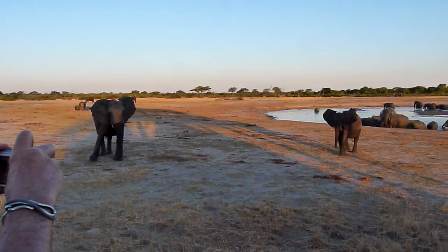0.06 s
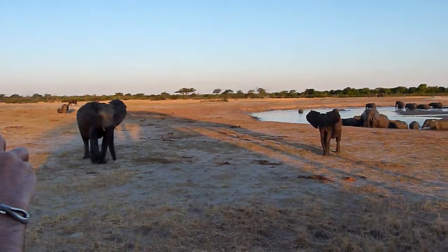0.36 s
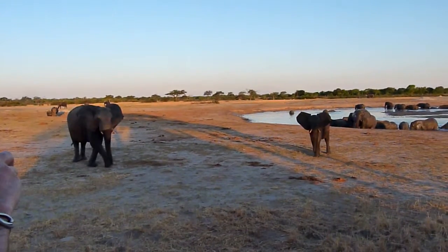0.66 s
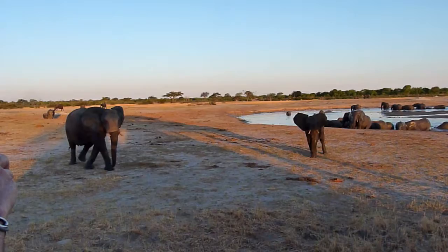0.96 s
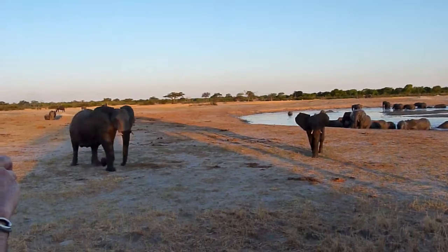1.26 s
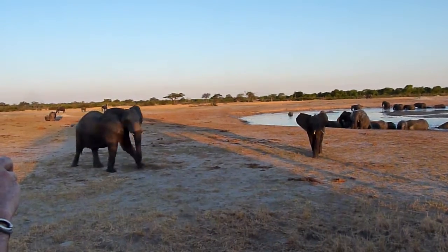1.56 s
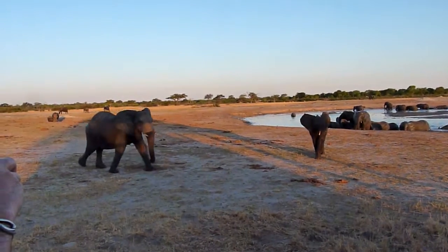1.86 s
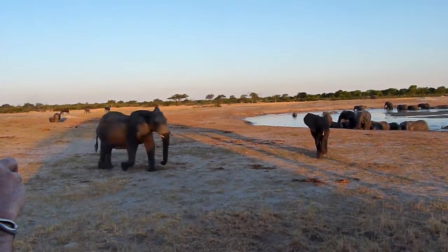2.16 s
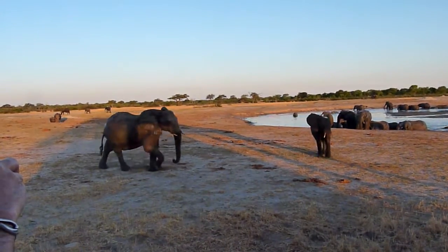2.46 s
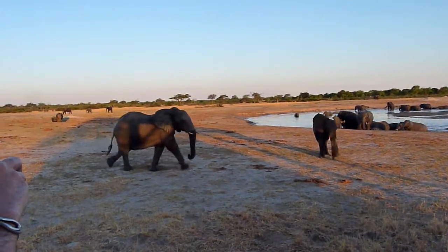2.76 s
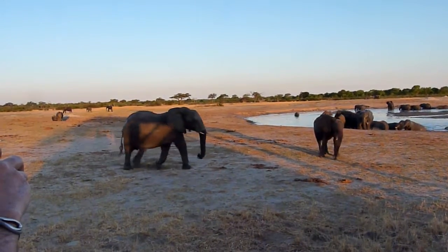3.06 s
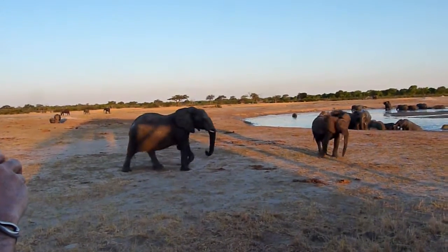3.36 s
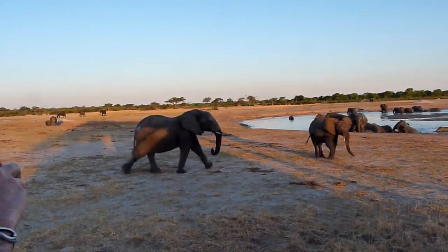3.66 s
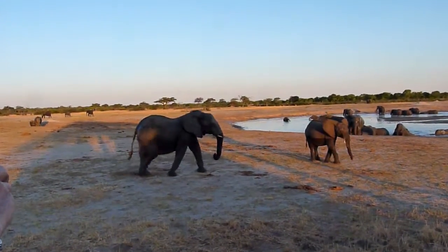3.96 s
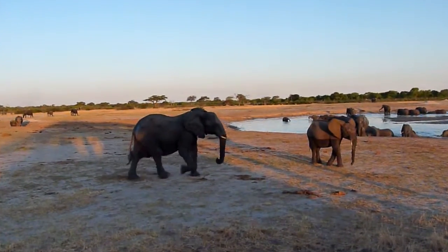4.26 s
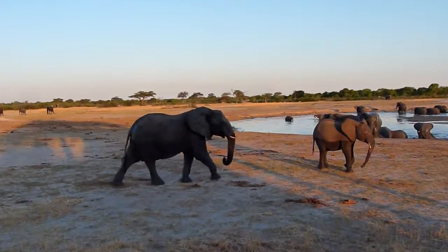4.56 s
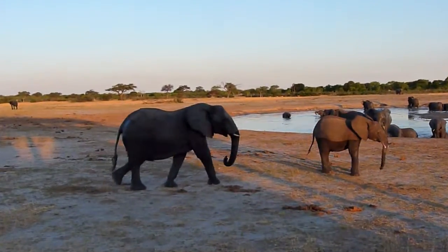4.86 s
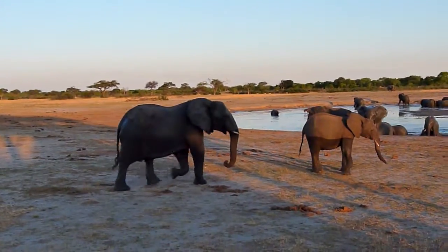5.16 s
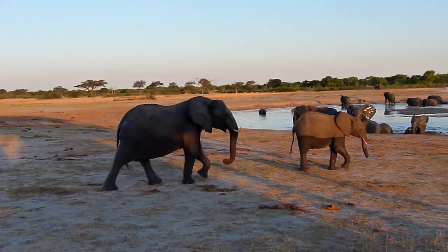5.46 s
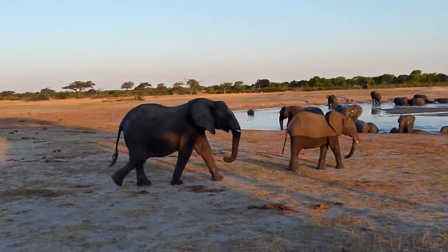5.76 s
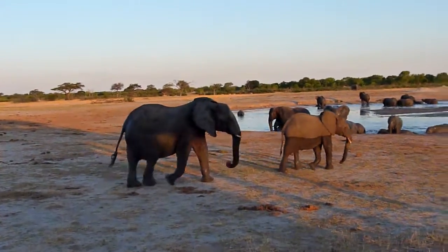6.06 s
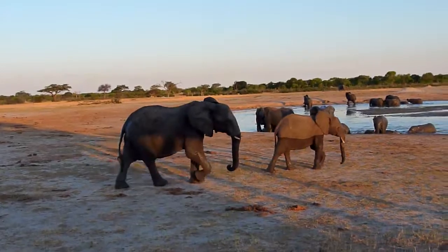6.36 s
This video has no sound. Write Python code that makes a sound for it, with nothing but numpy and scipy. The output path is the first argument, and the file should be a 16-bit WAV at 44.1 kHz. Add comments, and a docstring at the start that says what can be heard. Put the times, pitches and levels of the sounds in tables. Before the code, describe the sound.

Wind gusts rumble over the steady, rapid chugging of a distant pump engine, with faint dry grass hiss and occasional soft bumps.

```python
"""A slow single-cylinder engine, likely a water pump, thuds ten times a second across an open waterhole.
Each firing puffs from the exhaust pipe and echoes off the bush, over a soft wash of clatter and rattle.
Gusts rumble on the two microphone ports, among low thumps, small plops and knocks.
A hand rubs and creaks on the camera's case. Behind it all, dry grass swishes and hisses thinly.
The treble has three narrow, deep gaps."""
import sys
import numpy as np
from scipy import signal
from scipy.fft import rfft, irfft
from scipy.io import wavfile
from scipy.ndimage import uniform_filter1d

SR = 44100
rng = np.random.default_rng(int(sys.argv[2]) if len(sys.argv) > 2 else 0)


def bounce(signal):
    """Save signal as a 16-bit WAV file at the path given by the first command-line argument."""
    frames = np.transpose(np.atleast_2d(signal))
    limited = np.clip(frames, -1, 1)
    pcm = np.round(limited * 32767).astype(np.int16)
    wavfile.write(sys.argv[1], SR, pcm)


N = 283122
TIME = np.arange(N) / SR


def crank(firing_hz=10.265, sag_hz_per_s=.0142, first_firing_s=.0382):
    """Running count of engine cycles: an idle that slows very slightly."""
    return firing_hz * (TIME - first_firing_s) - sag_hz_per_s * TIME ** 2 / 2


def thud(pitch_hz, rise_s=.0023, fall_s=.0048, sag_per_s=35):
    """One puff from the pipe: a few cycles that swell fast, sag in pitch and die."""
    t = np.arange(-SR // 64, SR // 64) / SR
    cycles = pitch_hz * (t - sag_per_s * t ** 2 / 2)
    return np.cos(2 * np.pi * cycles) * swell(t, rise_s, fall_s)


# Slapback off the bush: (delay [s], signed gain [ratio])
THUD_ECHOES = [(0.0105, -0.16), (0.026, -0.3), (0.0287, -0.091), (0.0352, 0.1), (0.067, .21),
               (.076, -0.068), (0.0917, 0.21)]
# Diffuse bed of thuds scattered by ground and bush: (frequency [Hz], relative level [dB])
SCATTER_EQ = [(60, -3.5), (160, -8.5), (250, -2.5), (330, 1), (430, 1.5), (520, -14), (900, -44)]
# Level ride of the thuds across the water: (time [s], gain [dB])
THUD_RIDE = [(0, 1), (1.4, 0.1), (3.2, -0.2), (3.35, -3), (5, -2.4), (5.9, -.5), (6.42, -0.8)]

def exhaust(turns, jitter_s=.00021, pitch_spread=.06, spread_db=.77):
    """Each firing gives a slightly different thud, with a low push, a pipe ring and wavering echoes."""
    push = gain_of(-18) * thud(137, rise_s=.0062, fall_s=.0042, sag_per_s=0)
    pipe = gain_of(-15) * ringing(hz=432.6, t60=.05, rise_s=.0015)
    firing_times = TIME[1:][np.diff(np.floor(turns)) > 0]
    direct = np.zeros((2, N))
    for firing_s in firing_times:
        size, pitch, late = rng.standard_normal(3)
        puff = (thud(pitch_hz=279 * (1 + pitch_spread * pitch)) + push) * gain_of(spread_db * size)
        peak_s = firing_s + jitter_s * late
        add(direct, peak_s - len(puff) / (2 * SR), puff)
        add(direct, peak_s, pipe)
    out = direct.copy()
    for delay_s, gain in THUD_ECHOES:
        add(out, delay_s, gain * direct * (1 + .25 * flutter(4)))
    scatter = gain_of(-21.5) * noise(SCATTER_EQ, coherence=.98)
    return (out + scatter) * gain_of(-23.5 + follow(THUD_RIDE))


# Midrange wash of the mechanism: (frequency [Hz], relative level [dB])
CLATTER_EQ = [(250, -26), (520, -7.5), (620, -0.5), (750, 3.5), (950, 2), (1100, -3), (1300, -19),
              (1400, -11.5), (1600, -8), (1900, -19.5), (2300, -20.5), (3200, -44), (6000, -57)]
# Bright ring of the engine's knock: (frequency [Hz], relative level [dB])
KNOCK_EQ = [(900, -35), (1400, -9), (1550, 3), (1700, -2), (2400, -31), (4000, -43)]
# Level ride of clatter and rattle as the air carries them over the water: (time [s], gain [dB])
CLATTER_RIDE = [(0, 2), (.3, 1.5), (.8, -1), (1.55, 1.5), (2.6, 1.5), (3.25, 0.9), (3.65, -0.5), (4.55, -3),
                (5.4, 1), (6.42, 0)]

def clatter(turns, knock_turn=.88, knock_width_turns=.03):
    """Valves and gears blur into a wash, with a brighter knock just before each thud."""
    turns_from_knock = (turns - knock_turn + .5) % 1 - .5
    accent = swell(turns_from_knock, knock_width_turns, knock_width_turns)
    wash = noise(CLATTER_EQ, coherence=1) * gain_of(1.37 + .85 * flutter(27) + .32 * accent)
    knock = gain_of(-22) * accent * noise(KNOCK_EQ, coherence=.87)
    return (wash + knock) * gain_of(-47.5 + follow(CLATTER_RIDE)) * pan(-.88)


# Loose engine parts: (pitch [Hz], relative level [dB], decay t60 [s])
RATTLE_MODES = [(728.3, -1.5, 0.26), (866, -2, 0.051), (979, 0.5, 0.045), (1448, -9, .06),
                (1565, -11, 0.063), (1714, -9.5, 0.028), (2122, -17, 0.1)]

def rattle(taps_per_s=45, spread_db=2):
    """Loose metal is shaken into short rings, each part tapping at random."""
    out = np.zeros(N)
    for hz, db, t60 in RATTLE_MODES:
        hits = rng.random(N) < taps_per_s / SR
        taps = hits * gain_of(spread_db * np.clip(rng.standard_normal(N), -2, 2))
        rings = signal.oaconvolve(taps, ringing(hz, t60, rise_s=.00059))[:N]
        out += gain_of(db) * unit_rms(rings)
    return unit_rms(out) * gain_of(-56 + follow(CLATTER_RIDE)) * pan(-.76)


# Gust cues: (peak time [s], rise [s], fall [s], relative level [dB], pan left [dB])
GUST_CUES = [(.05, .05, 0.055, -33, 5), (.2, 0.043, 0.17, -33, -7), (.58, 0.25, .12, -35, 11),
             (0.831, .12, 0.24, -29, 7), (1.13, 0.18, .18, -32, 5.5), (1.385, 0.079, 0.11, -25.5, 5.5),
             (1.78, 0.11, 0.11, -37.5, 3), (2.69, 0.074, 0.11, -33.5, -7.5), (2.86, .11, 0.16, -32, 7.5),
             (3, .45, 0.74, -36.5, -4), (3.519, 0.021, 0.067, -36.5, -7), (3.8, 0.053, .05, -43, 10),
             (4.039, 0.086, 0.12, -37.5, -7), (4.82, 0.26, 0.14, -43, 8.5), (5.29, 0.13, .1, -27.5, 5),
             (5.35, 0.4, .4, -36, 3), (5.62, 0.062, 0.093, -32.5, 9), (6.05, 0.33, 0.26, -41, 11)]
# Soft rumble of light wind: (frequency [Hz], relative level [dB])
RUMBLE_EQ = [(10, -49), (25, -29), (45, -6), (80, -1), (115, -2.5), (155, -7.5), (200, -10), (300, -23),
             (500, -26.5), (1000, -40), (2500, -58), (8000, -95)]
# Fuller buffet of a strong gust: (frequency [Hz], relative level [dB])
BUFFET_EQ = [(10, -46), (25, -26), (50, -5), (85, -1.5), (125, -0.5), (175, -3), (250, -9), (400, -23),
             (700, -30), (1500, -52), (5000, -54), (12000, -72)]

def wind(breeze_db=-41.5, eddy_db=1.28):
    """Gusts swell over a breeze and buffet each port separately; the strong ones sound brighter."""
    power = (gain_of(breeze_db) * pan(-3)) ** 2
    for peak_s, rise_s, fall_s, db, left_db in GUST_CUES:
        power = power + (gain_of(db) * pan(left_db)) ** 2 * swell(TIME - peak_s, rise_s, fall_s)
    wind_db = 10 * np.log10(power)
    strength = np.clip((wind_db + 37.5) / 13, 0, 1)
    # Eddies cross the left port first: (frequency [Hz], left lead [rad])
    lead = [(30, .77), (90, 1.06), (200, 1.16)]
    rumble = np.sqrt(1 - strength) * noise(RUMBLE_EQ, coherence=.31, lead=lead)
    buffet = np.sqrt(strength) * noise(BUFFET_EQ, coherence=.31, lead=lead)
    lumps_db = eddy_db * np.array([flutter(12), flutter(17)])
    return (rumble + buffet) * gain_of(wind_db + lumps_db - 2.5)


# Low thumps, small plops and knocks: (time [s], pitch [Hz], level [dB], decay t60 [s])
THUMP_AND_PLOP_CUES = [(0.0708, 175, -19, .022), (.176, 160, -20.5, 0.026), (.295, 785, -35, 0.041),
                       (.343, 190, -23, 0.044), (.575, 220, -23, 0.023), (.620, 600, -29, 0.0081),
                       (.797, 144.2, -23.5, 0.071), (.851, 826, -44, .03), (1.354, 131.6, -14, 0.052),
                       (1.46, 461, -23.5, 0.028), (1.469, 694, -27, 0.023), (1.481, 772, -29.5, 0.034),
                       (1.494, 600, -30, 0.026), (1.777, 760, -40, 0.029), (2.052, 662, -31, 0.041),
                       (2.44, 770, -38, 0.031), (2.855, 519, -36, 0.22), (3.272, 566, -36, 0.1),
                       (3.293, 802, -35, 0.14), (3.424, 750, -33, .04), (3.434, 635, -22, 0.04),
                       (3.449, 681, -31.5, 0.064), (4.761, 513, -29, 0.026), (4.765, 3234, -38.5, 0.016),
                       (4.768, 1290, -37, 0.027), (4.831, 870, -25.5, 0.014), (4.981, 859, -40, 0.022),
                       (5.011, 873, -32, 0.026), (5.096, 900, -35, 0.013), (5.225, 170, -17, 0.034),
                       (5.3015, 3410, -41, .009), (5.689, 1530, -36, 0.014), (5.694, 600, -25, 0.022),
                       (6.052, 630, -35, 0.065), (6.126, 910, -38, 0.031)]

def thumps_and_plops(roughness=.33, faint_count=4, faint_hz=695, spread_octaves=.19):
    """Each thump, plop or knock is one short, slightly rough ring; a few faint extras land at random."""
    faint = [(when * N / SR, faint_hz * 2 ** (spread_octaves * (2 * pitch - 1)), -32, .019)
             for when, pitch in rng.random((faint_count, 2))]
    out = np.zeros((2, N))
    for start_s, hz, db, t60 in THUMP_AND_PLOP_CUES + faint:
        add(out, start_s, gain_of(db) * ringing(hz, t60, rise_s=.00041) * pan(1.54))
    return out * (1 + roughness * flutter(70))


# Resonances of the case: (pitch [Hz], relative level [dB], decay t60 [s], change over the creak [dB])
CASE_MODES = [(766, -7, 0.012, -5), (1008, 5, 0.01, -4), (1330, 8, 0.015, 5), (1500, 0.5, .024, 5),
              (2230, -1, 0.0027, 8), (3420, 2.5, 0.0021, 11), (5970, 3, 0.0027, -13),
              (9100, -7, .0015, -10), (13000, -13, 0.0037, -8)]

def creak(start_s=6.165, length_s=.034, level_db=-37.5, slip_hz=770):
    """A quick run of nearly regular slips squeaks through the case's modes, off to the left."""
    t = np.arange(4096) / SR
    progress = np.minimum(t / length_s, 1)
    grip = progress ** .23 * (t < length_s)
    slip_rate = slip_hz * (1 + .07 * grain(len(t), smooth_samples=60))
    slipping = np.diff(np.floor(np.cumsum(slip_rate) / SR), prepend=-1)
    slips = grip * slipping * (1 + .55 * rng.standard_normal((2, len(t))))
    squeak = 0
    for hz, db, t60, change_db in CASE_MODES:
        drive = slips * gain_of(db + change_db * (progress - .5))
        squeak = squeak + signal.fftconvolve(drive, ringing(hz, t60, rise_s=.00005)[None], axes=1)
    squeak /= squeak[:, :round(length_s * SR)].std(axis=1, keepdims=True) + 1e-12
    out = np.zeros((2, N))
    add(out, start_s, gain_of(level_db) * squeak * pan(6))
    return out


# Skin brushing the case: (time [s], length [s], level [dB], pan left [dB], treble tilt [dB/octave])
RUB_CUES = [(0.69, 0.011, -56, -3.5, 0), (0.868, 0.039, -62, -7, 4), (.8815, 0.0045, -48.5, -6, 3),
            (0.933, 0.011, -47, -5, 0.5), (0.952, 0.014, -48.5, -4, 2), (2.703, .013, -65, 1, 9),
            (4.756, 0.018, -48.5, -10, -1.5), (4.769, 0.0019, -44, 12, 0), (4.8203, 0.0012, -49, 2, 3),
            (5.68, 0.025, -45, -4, -9), (6.366, 0.0046, -48.5, 0, -2)]
# Dry friction tone, also used for the grass ticks: (frequency [Hz], relative level [dB])
FRICTION_EQ = [(300, -8), (1200, 13.5), (2200, 9.5), (3500, 5), (5500, 3.5), (7000, 0.5), (11000, 0),
               (13300, -1), (15000, -3), (16000, -15)]

def rubs():
    """Skin drags over the case in short, grainy strokes."""
    t = np.arange(4096) / SR
    out = np.zeros((2, N))
    for start_s, length_s, db, left_db, tilt_db in RUB_CUES:
        stroke = 2 * t / length_s * np.exp(1 - 2 * t / length_s)
        texture = gain_of(2 * grain(len(t), smooth_samples=50))
        friction = noise(FRICTION_EQ, coherence=.82, tilt_db=tilt_db, size=len(t))
        add(out, start_s, gain_of(db) * stroke * texture * friction * pan(left_db))
    return out


# Swishes in the grass: (peak time [s], half length [s], level [dB], pan left [dB])
SWISH_CUES = [(.2, .16, -53, -7), (1.6, 0.35, -58.5, -5), (2.369, 0.13, -54, -2), (3.062, .15, -55, -8),
              (3.846, 0.26, -62.5, -6), (4.218, .048, -61.5, -13), (5.066, 0.083, -60.5, -2),
              (5.446, 0.13, -60, 1), (5.86, 0.13, -67.5, 14)]
# Papery tone of the grass: (frequency [Hz], relative level [dB])
SWISH_EQ = [(800, -24), (1600, 15.5), (2200, 9.5), (3300, 5.5), (4100, 6.5), (5000, 3.5), (5800, 3.5),
            (6700, -3.5), (8800, -4.5), (10500, -14), (15000, -23)]

def swishes():
    """Dry grass rustles in a few soft, grainy swells."""
    envelope = sum(gain_of(db) * pan(left_db) * swell(TIME - peak_s, half_s, half_s)
                   for peak_s, half_s, db, left_db in SWISH_CUES)
    return envelope * noise(SWISH_EQ, coherence=.31) * gain_of(2 * flutter(140))


# Thin, airy bed: (frequency [Hz], relative level [dB])
HISS_EQ = [(300, -10), (1200, 14.5), (2200, 9), (3200, 6.5), (4100, 7), (5000, 3), (5800, 1), (6500, -2.5),
           (7400, 0), (9000, -4.5), (12000, -5), (15000, -13.5)]
# How alike the hiss is in the two ports: (frequency [Hz], coherence [ratio])
HISS_COHERENCE = [(500, 0.7), (2000, 0.5), (3000, 0.87), (4000, 0.84), (5500, .05), (8000, 0.4),
                  (15000, 0.38)]
# The hiss reaches the ports out of step: (frequency [Hz], left lead [rad])
HISS_PHASE = [(1000, 0), (1800, 0), (2200, 1.4), (3000, 1.15), (3700, 1.3), (4300, -2.9), (5500, 1.5),
              (9000, -1.5), (13000, -3.5)]

def hiss(ticks_per_s=25, fade_db_per_s=.33, lull_start_s=3.28, lull_end_s=4.97, edge_s=.05):
    """Air in dry grass, a little to the right: a slowly easing bed with tiny ticks and one 2 dB lull."""
    air = noise(HISS_EQ, HISS_COHERENCE, lead=HISS_PHASE) * gain_of(.5 * flutter(30))
    ticks = (rng.random(N) < ticks_per_s / SR) * rng.random(N) ** 2
    tick_tails = signal.lfilter([1], [1, -np.exp(-1 / (SR * .0017))], ticks)
    crackle = gain_of(5.5) * tick_tails * noise(FRICTION_EQ, coherence=.3)
    lull = (np.tanh((TIME - lull_start_s) / edge_s) - np.tanh((TIME - lull_end_s) / edge_s)) / 2
    return (air + crackle) * gain_of(-54 - fade_db_per_s * TIME - 2 * lull) * pan(-2.4)


def noise(eq, coherence, tilt_db=0, lead=None, size=N):
    """Stereo noise at unit rms; coherence is a number or a curve, tilt is per octave above 1 kHz."""
    hz = np.fft.rfftfreq(size, 1 / SR)
    left, independent = rfft(rng.standard_normal((2, size)))
    shared = np.clip(curve_at(coherence, hz) if np.ndim(coherence) else coherence, -1, 1)
    lag = np.exp(-1j * curve_at(lead, hz)) if lead else 1
    right = shared * lag * left + np.sqrt(1 - shared ** 2) * independent
    colour = gain_of(curve_at(eq, hz) + tilt_db * np.log2(np.maximum(hz, 1000) / 1000))
    return unit_rms(irfft(np.array([left, right]) * colour, size))


def ringing(hz, t60, rise_s):
    """One damped mode with a soft attack."""
    t = np.arange(SR // 4) / SR
    return np.sin(2 * np.pi * hz * t) * (1 - np.exp(-t / rise_s)) * gain_of(-60 * t / t60)


def flutter(rate_hz):
    """A random wobble at unit rms, up to about the given rate."""
    hz = np.fft.rfftfreq(N, 1 / SR)
    return unit_rms(irfft(rfft(rng.standard_normal(N)) * np.exp(-(hz / rate_hz) ** 2), N))


def grain(size, smooth_samples):
    """Fast random roughness at unit rms."""
    return unit_rms(uniform_filter1d(rng.standard_normal(size), smooth_samples))


def swell(t, rise, fall):
    """A smooth hump of height one, peaking at t = 0."""
    return np.exp(-(t / np.where(t < 0, rise, fall)) ** 2)


def curve_at(points, hz):
    """Joins breakpoints on a log-frequency axis."""
    point_hz, values = np.transpose(points)
    return np.interp(np.log(hz + 1), np.log(point_hz + 1), values)


def follow(ride):
    """A level ride in dB at every sample."""
    return np.interp(TIME, *np.transpose(ride))


def gain_of(db):
    """Decibels to pressure."""
    return 10 ** (np.asarray(db) / 20)


def unit_rms(x):
    """Scales to an rms of one."""
    return x / np.sqrt(np.mean(x ** 2) + 1e-20)


def pan(left_db):
    """Stereo gains that put the left side left_db above the right."""
    return gain_of(np.array([[left_db], [-left_db]]) / 2)


def add(mix, start_s, sound):
    """Drops a sound into the mix at its cue."""
    part = mix[:, max(round(start_s * SR), 0):][:, :sound.shape[-1]]
    part += sound[..., :part.shape[1]]


def scene():
    """The mix: engine, weather and short spot sounds."""
    turns = crank()
    engine = exhaust(turns) + clatter(turns) + rattle()
    weather = wind() + hiss() + swishes()
    return engine + weather + rubs() + thumps_and_plops() + creak()


# Three narrow, deep gaps in the treble: (centre [Hz], wide cut [Hz], narrow cut [Hz])
TREBLE_GAPS = [(2626, 650, 70), (4570, 620, 170), (7910, 310, 70)]

def record(dry, cutoff_hz=15500):
    """Tiny fades at both ends, three narrow, deep gaps in the treble, then a steep high cut."""
    out = dry * signal.windows.tukey(N, 200 / N)
    for hz, wide_hz, narrow_hz in TREBLE_GAPS:
        for width_hz in (wide_hz, narrow_hz):
            out = signal.lfilter(*signal.iirnotch(hz, hz / width_hz, SR), out)
    high_cut = signal.firwin(401, cutoff_hz, window=("kaiser", 9), fs=SR)
    return signal.oaconvolve(out, high_cut[None], "same")


dry = scene()
out = record(dry)
bounce(out)
```